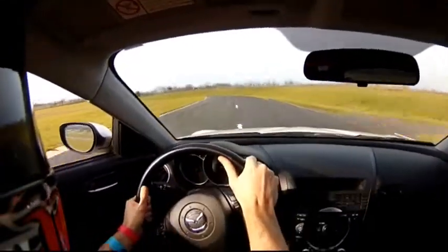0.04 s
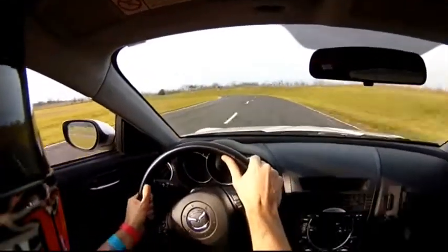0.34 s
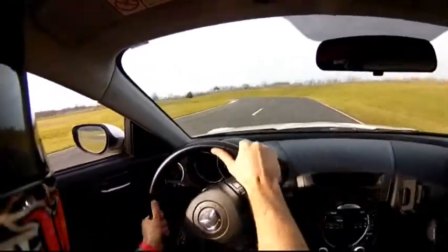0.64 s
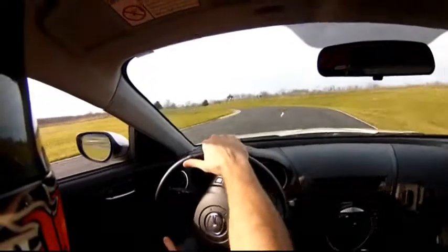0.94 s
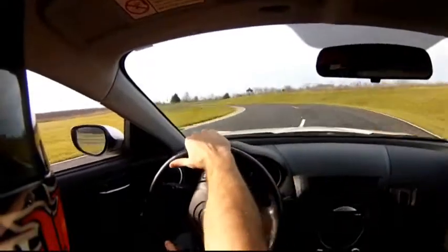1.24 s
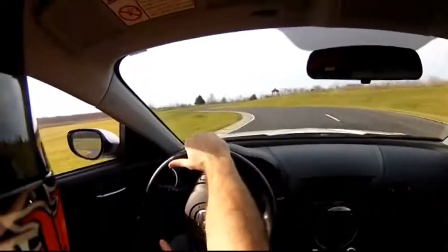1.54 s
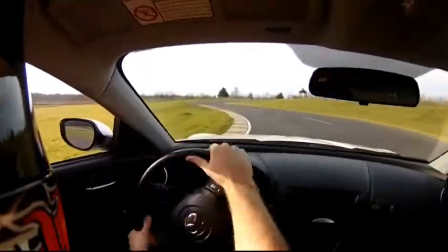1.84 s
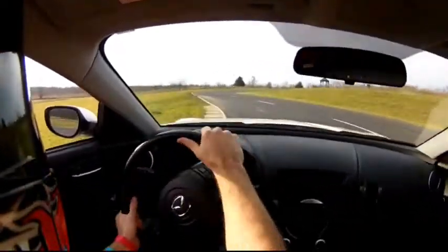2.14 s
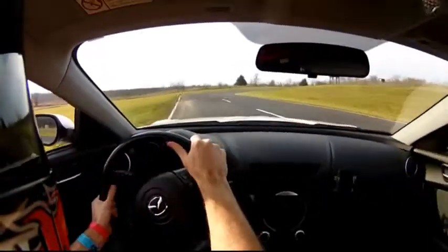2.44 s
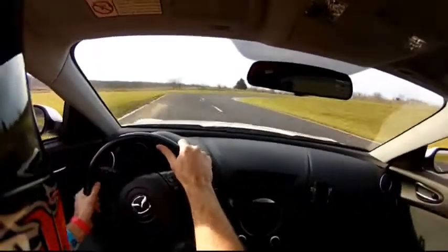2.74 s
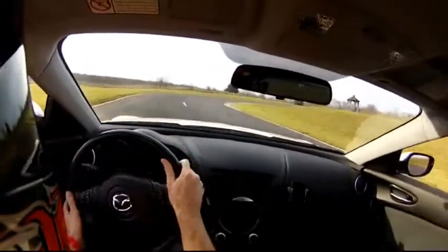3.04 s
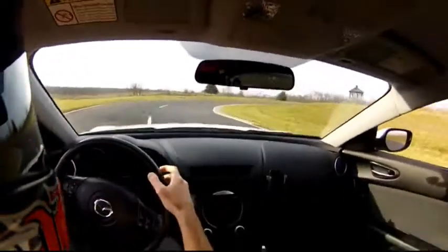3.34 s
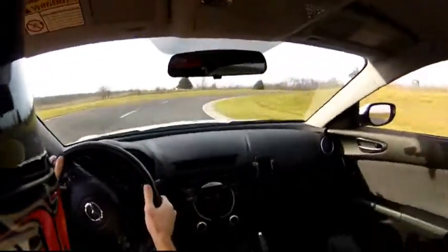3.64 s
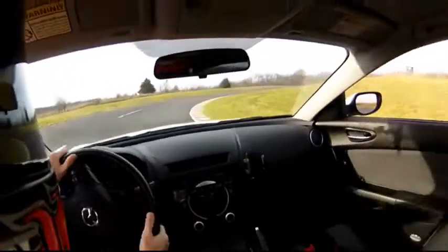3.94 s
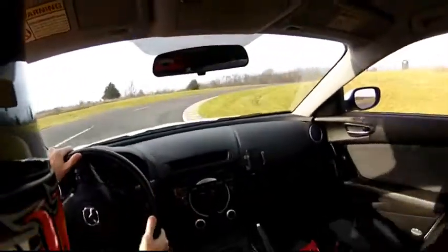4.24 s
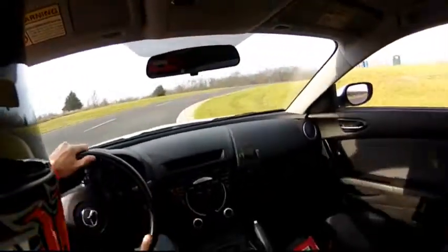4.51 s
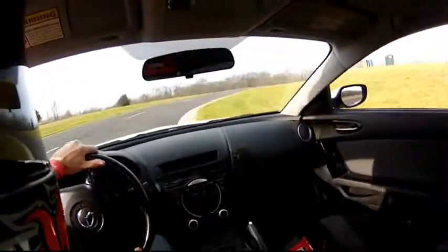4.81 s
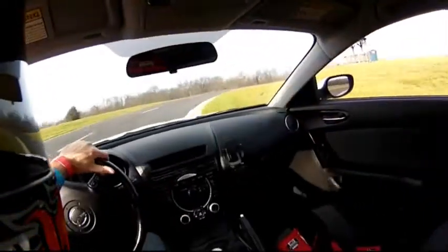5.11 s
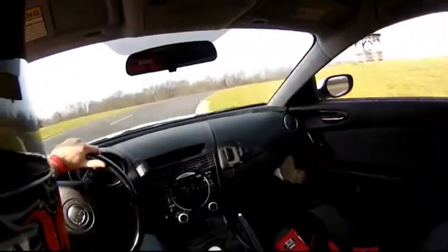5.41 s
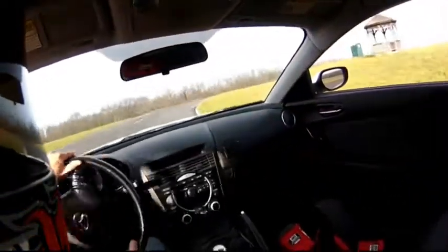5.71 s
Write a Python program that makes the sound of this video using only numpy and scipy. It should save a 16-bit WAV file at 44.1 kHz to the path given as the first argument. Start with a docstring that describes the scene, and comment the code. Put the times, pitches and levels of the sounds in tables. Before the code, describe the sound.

Inside a hard-driven sports car, the engine drones, pulls and eases off over road rumble and bumps, while tyres squeal through two bends.

```python
"""Inside a rotary-engined sports car driven hard through two bends of a race track. From the start the
engine drones, the road rumbles through the shell and bumps thump the body. After a short pull the engine
overruns; from 1.3 s the trim rattles and the tyres scrub and squeal through the first bend. It pulls
again, the tyres sing through the second bend from 4 s, and the growl returns near the end. All along, a
small camera ducks after bumps and holds each sample of a low rate, mirroring the sound into the treble."""
import sys
import numpy as np
from scipy import signal
from scipy.fft import rfft, irfft, next_fast_len
from scipy.io import wavfile
from scipy.ndimage import map_coordinates

SR = 44100
rng = np.random.default_rng(int(sys.argv[2]) if len(sys.argv) > 2 else 0)


def materialize(psi):
    """Save the field psi as 16-bit PCM at rate SR to the path in sys.argv[1].

    A 1-D psi becomes a single channel; in a 2-D psi each row is a channel.
    """
    bounded = np.clip(np.atleast_2d(psi).T, -1, 1)
    quanta = np.round(bounded * 32767).astype(np.int16)
    wavfile.write(sys.argv[1], SR, quanta)


N = 263277
TIME = np.arange(N) / SR


def from_db(db):
    """Decibels to gain."""
    return 10 ** (np.asarray(db) / 20)


def unit_rms(x):
    """Scale to rms 1."""
    return x / np.sqrt(np.mean(x ** 2) + 1e-20)


def curves(rows):
    """The columns of an automation table, drawn out to every sample."""
    seconds, *columns = np.transpose(rows)
    return [np.interp(TIME, seconds, column) for column in columns]


def envelope(start, attack, hold, release):
    """Fades in, holds and fades out along straight lines; times in seconds."""
    return np.clip(np.minimum((TIME - start) / attack, 1 - (TIME - start - attack - hold) / release), 0, 1)


def butter(x, hz, kind, order=2):
    """Butterworth filter."""
    return signal.sosfilt(signal.butter(order, hz, kind, fs=SR, output="sos"), x)


def drift(rate_hz):
    """A smooth random wobble of rms 1, moving at about the given rate."""
    pole = np.exp(-20 * np.pi * rate_hz / SR)   # runs at a tenth of the sample rate
    slow = signal.lfilter([1], [1, -2 * pole, pole * pole], rng.standard_normal(N // 10 + 4002))[4000:]
    return np.interp(np.arange(N) / 10, np.arange(len(slow)), unit_rms(slow))


def noise(spectrum):
    """Noise of the given colour, falling steeply beyond its ends; rms 1."""
    hz, db = np.transpose(spectrum)
    size = next_fast_len(N)
    bin_hz = np.maximum(np.arange(size // 2 + 1) * SR / size, 1)
    roll_off = 1 / (1 + (hz[0] / bin_hz / 2) ** 4 + (bin_hz / hz[-1] / 2) ** 4)
    colour = from_db(np.interp(np.log(bin_hz), np.log(hz), db)) * roll_off
    return unit_rms(irfft(rfft(rng.standard_normal(size)) * colour, size)[:N])


def phase_of(hz):
    """Running phase of a moving pitch."""
    return 2 * np.pi * np.cumsum(hz) / SR


def noise_band(phase, width_hz):
    """A band of noise that rides on a moving pitch; rms 1."""
    return drift(width_hz) * np.cos(phase) + drift(width_hz) * np.sin(phase)


# The driver's foot. Each row: press in seconds, lift in seconds, growl boost in dB when fully down.
THROTTLE_PRESSES = [(-.5, 0.02, 6), (0.467, 1.062, 13), (2.24, 3.28, 20), (5.314, 5.986, 16)]

def throttle(open_s=0.57, close_s=0.27, overrun_db=-47.5):
    """The growl's gain swells as the foot goes down gently and drops as it lifts quickly."""
    growl_db = overrun_db
    for start, lift, boost_db in THROTTLE_PRESSES:
        pedal = envelope(start, open_s, lift - start - open_s, close_s)
        growl_db = growl_db + boost_db * np.sin(np.pi / 2 * pedal)
    return from_db(growl_db)


# The revs. Each row: time in seconds, firing rate in Hz.
REVS = [(0, 125), (.3, 115), (.6, 114.5), (.82, 117), (1.2, 117), (2.25, 100), (2.45, 106.5), (2.85, 108.4),
        (3.5, 115), (4, 104), (4.8, 95), (5.3, 94), (5.65, 99), (5.97, 100)]
# The drone of the first order. Each row: time in seconds, level in dB.
DRONE_LEVELS = [(0, -31), (.15, -23), (.38, -20), (.62, -25), (.85, -21.5), (1.7, -26), (2.5, -32.5),
                (3.3, -25.5), (3.65, -29.5), (5.97, -25)]
# The boom of the second order. Each row: time in seconds, level in dB.
BOOM_LEVELS = [(0, -32), (.38, -27.5), (.6, -35), (.85, -22), (1.17, -19.5), (1.35, -31.5), (2.3, -38.5),
               (2.8, -22), (3.08, -20.5), (3.28, -34.5), (3.47, -26.5), (3.62, -29), (3.95, -28.5),
               (4.5, -38), (5.25, -40.5), (5.5, -29), (5.97, -30.5)]
# Exhaust and cabin resonances that the upper orders sweep. Each row: frequency in Hz, relative gain in dB.
EXHAUST_COLOUR = [(290, -13), (335, -0.5), (400, -3), (445, -0.5), (500, -33), (550, -6.5), (610, -18.5),
                  (690, -7), (765, -22), (875, -16.5), (980, -22), (1100, -15), (1250, -26), (1800, -31.5)]

def engine(wander=0.00436, flutter_db=3.0, burn_roughness=0.24, rasp_db=-15, order_count=17):
    """Evenly spaced firings: two booming low orders, and a raspy growl that opens with the throttle."""
    firing_hz, = curves(REVS)
    drone_db, = curves(DRONE_LEVELS)
    boom_db, = curves(BOOM_LEVELS)
    phase = phase_of(firing_hz * (1 + wander * drift(13.7)))
    orders = {}
    for k in range(1, order_count + 1):
        tone = np.sqrt(2) * np.sin(k * phase + rng.uniform(0, 2 * np.pi))
        orders[k] = tone * from_db(flutter_db * drift(11.8))
    hz, db = np.transpose(EXHAUST_COLOUR)
    growl = sum(orders[k] * np.interp(k * firing_hz, hz, from_db(db)) for k in orders if k > 2)
    growl = unit_rms(growl) * (1 + burn_roughness * drift(93))   # no two burns are equally strong
    gas = butter(rng.standard_normal(N), [400, 1400], "band")
    rasp = unit_rms(gas * (1 + np.cos(phase)) ** 2)   # one puff per firing
    low_end = from_db(drone_db) * orders[1] + from_db(boom_db) * orders[2]
    return low_end + throttle() * (growl + from_db(rasp_db) * rasp)


# The track surface. Each row: time in seconds, suspension shudder in dB, relative tyre roar in dB.
SURFACE_LEVELS = [(0, -45, -40.5), (.37, -25, -41.5), (.62, -28.5, -44.5), (.9, -29, -40.5),
                  (1.04, -21.5, -36), (1.45, -22.5, -44.5), (2.25, -20.5, -41), (2.5, -27, -43.5),
                  (2.95, -25, -40), (3.6, -24.5, -37.5), (4.2, -24.5, -43.5), (4.65, -26, -43),
                  (4.92, -20.5, -53.5), (5.3, -21.5, -46), (5.8, -24, -45.5)]
# Four noise colours, from low to high. Each row: frequency in Hz, relative density in dB.
SHELL_RUMBLE = [(12, -3.5), (26, -7), (40, 2.5), (58, -14.5), (80, -16.5), (130, -36), (250, -40)]
SUSPENSION_SHUDDER = [(40, -18.5), (62, 5.5), (95, -1.5), (140, -0.5), (190, -12), (300, -19.5), (600, -36)]
TREAD_ROAR = [(120, -42), (220, 9.5), (330, 5), (500, 1.5), (750, -6), (1100, -8), (1500, -10.5),
              (2100, -23), (4000, -54)]
AIR_RUSH = [(800, 14), (1500, -1.5), (2100, 2.5), (2800, 2), (4000, 0.5), (5000, -2), (6000, -6)]

def road(rumble_db=-16.5, roar_boost_db=6.0, grain_db=2.5, rush_db=-46.5, rush_follow=0.93, side_db=-12):
    """The shell booms, the suspension shudders, the tread roars on coarse asphalt and air rushes past."""
    shudder_db, roar_db = curves(SURFACE_LEVELS)
    grain = from_db(grain_db * drift(14.5))
    rumble = from_db(rumble_db) * noise(SHELL_RUMBLE)
    shudder = from_db(shudder_db) * noise(SUSPENSION_SHUDDER)
    side = from_db(side_db) * noise(AIR_RUSH)   # only the air has stereo width
    air = noise(AIR_RUSH) + np.array([side, -side])
    rush = from_db(rush_db + rush_follow * (roar_db - roar_db.mean())) * air   # swells with the roar
    roar = from_db(roar_db + roar_boost_db) * noise(TREAD_ROAR)
    return rumble + shudder + grain * (roar + rush)


# Thumps from the track. Each row: start in seconds, relative level in dB, left minus right in dB.
TRACK_BUMPS = [(.04, 0, 0), (1.033, 3, 0), (1.322, -1, 0), (1.746, -1.5, 0), (1.967, 0, 0), (2.867, -4, 0),
               (3.52, 2.5, 2), (3.682, .5, 0), (3.92, 1, 5), (4.209, 2, 0), (4.606, -1.5, 1.5),
               (5.088, -1.5, 0), (5.333, -2, 0), (5.812, -2, 0)]

def bumps(body_hz=56, decay_s=0.0047, gain_db=4.5, soften_hz=260):
    """Each bump gives the body one heavily damped bounce, softened by the tyres."""
    out = np.zeros((2, N))
    for start, db, pan_db in TRACK_BUMPS:
        age = np.maximum(TIME - start, 0)
        decay = np.exp(-np.minimum(age / decay_s, 20))
        bounce = rng.choice([-1, 1]) * np.sin(2 * np.pi * body_hz * age) * decay
        out += np.outer(from_db([db + pan_db / 2, db - pan_db / 2]), bounce)
    return from_db(gain_db) * butter(out, soften_hz, "low")


def stick_slip(hz, octave_db=-22.5):
    """Tread blocks vibrate almost as a sine, with a faint octave."""
    phase = phase_of(hz)
    return np.sqrt(2) * (np.sin(phase) + from_db(octave_db) * np.sin(2 * phase))


# The colour of grit torn over asphalt. Each row: frequency in Hz, relative density in dB.
GRIT_COLOUR = [(850, -22), (1200, 3.5), (1550, 7), (1900, -10.5), (2300, -8), (3100, -2.5), (3800, -14.5)]
# Tyre squeals. Each row: start, swell, hold and fade in seconds, first and last pitch in Hz,
# relative level in dB, share of grit in dB.
TYRE_SLIDES = [(0.082, 0.122, .11, 0.062, 1550, 1620, -49, -14),
               (1.294, 0.24, 0.13, .04, 1190, 1150, -48, -23),
               (1.673, 0.021, 0.3, 0.13, 1275, 1290, -35, -6),
               (1.802, 0.033, 0.046, .12, 1470, 1460, -39, -7.5),
               (2.058, 0.057, 0.18, 0.23, 1288, 1340, -36, -19),
               (2.082, 0.1, 0.14, 0.053, 1460, 1510, -40.5, -6),
               (4.03, 0.12, 0.093, 0.23, 1190, 1200, -38, -7),
               (4.232, 0.056, 0.42, .3, 1096, 1105, -38.5, -13),
               (4.92, 0.13, 0.18, 0.093, 1302, 1290, -47, -11),
               (5.206, 0.12, 0.484, 0.023, 1274, 1295, -39, -12.5),
               (5.544, 0.23, 0.042, 0.052, 2586, 2470, -41.5, -7.5),
               (5.805, 0.052, 0.2, 0.079, 1338, 1410, -36.5, -8.5)]

def slides(jitter=0.01693, stutter_db=4.0, sing_db=-3.5, scrub_db=-5.5, overtone_db=-16.5, gain_db=3.5):
    """A sliding tyre sings unsteadily while the rest of its tread scrubs near that pitch and tears grit."""
    out, grit = 0, noise(GRIT_COLOUR)
    for start, swell, hold, fade, first_hz, last_hz, db, grit_db in TYRE_SLIDES:
        hz = np.interp(TIME, [start, start + swell + hold + fade], [first_hz, last_hz])
        tone = stick_slip(hz * (1 + jitter * drift(70.5)))
        song = unit_rms(tone * from_db(stutter_db * drift(44)))
        phase = phase_of(1.02 * hz)   # the scrub sits slightly sharp
        width_hz = 0.095 * first_hz   # higher slides scrub more widely
        scrub = noise_band(phase, width_hz) + from_db(overtone_db) * noise_band(2 * phase, 2 * width_hz)
        tyre = from_db(sing_db) * song + from_db(scrub_db) * scrub + from_db(grit_db) * grit
        out = out + envelope(start, swell, hold, fade) * from_db(db + gain_db) * tyre
    return butter(out, 950, "high", order=6)   # the squeals carry nothing below about 950 Hz


# Clean tyre chirps. Each row: start in seconds, length in seconds, centre pitch in Hz, level in dB.
TYRE_CHIRPS = [(0.303, 0.066, 1603, -42), (1.688, 0.049, 1286, -25), (1.734, 0.03, 1470, -31),
               (1.779, 0.056, 1280, -23.5), (1.868, 0.049, 1282, -25), (2.085, .031, 1453, -28.5),
               (2.161, 0.018, 1357, -20), (2.194, 0.029, 1485, -27.5), (2.245, 0.051, 1285, -32),
               (4.49, 0.032, 1110, -28), (4.585, 0.037, 1117, -30), (4.698, 0.038, 1110, -30.5),
               (5.624, 0.053, 1280, -35), (5.751, 0.069, 1280, -29.5), (5.761, 0.062, 2490, -39)]

def chirps(jitter=0.012, sag_hz_per_s=800, attack_s=0.0079, release_s=0.017):
    """For a moment the whole contact patch slips in step; the pitch sinks as the tread grips again."""
    out, waver = np.zeros(N), 1 + jitter * drift(60)
    for start, length, hz, db in TYRE_CHIRPS:
        span = np.flatnonzero((TIME >= start) & (TIME < start + length))
        age = TIME[span] - start
        shape = np.clip(np.minimum(age / attack_s, (length - age) / release_s), 0, 1)
        glide_hz = (hz - sag_hz_per_s * (age - length / 2)) * waver[span]
        out[span] += from_db(db) * shape * stick_slip(glide_hz)
    return out


# Ticks of loose trim. Each row: start in seconds, strength of the hit in dB.
TRIM_TICKS = [(1.324, -52), (1.449, -61), (1.737, -47), (2.872, -51), (3.641, -52.5), (3.837, -49),
              (3.915, -54.5), (4.417, -56.5), (4.832, -61.5), (4.903, -63), (4.951, -64), (5.092, -51.5),
              (5.169, -59), (5.335, -52)]
# The ring of the plastic. Each row: pitch in Hz, relative gain in dB, seconds to die away by 60 dB.
TRIM_MODES = [(1960, 5, 0.0068), (2620, 4, 0.0044), (3210, 0.5, 0.011), (3900, 3, 0.0045),
              (4100, 10, 0.0026), (4840, -2, 0.012)]

def trim_rattle(chatter_s=0.0053, gain_db=-4.0):
    """Loose plastic chatters for a few milliseconds and rings in its modes."""
    force, out = 0, 0
    for start, db in TRIM_TICKS:
        decay = np.exp(-np.clip((TIME - start) / chatter_s, 0, 20))
        force = force + from_db(db) * (TIME >= start) * decay
    for hz, db, ring_s in TRIM_MODES:
        pole, angle = from_db(-60 / (ring_s * SR)), 2 * np.pi * hz / SR
        chatter = force * rng.standard_normal(N) + 1e-18
        ring = signal.lfilter([0, np.sin(angle)], [1, -2 * pole * np.cos(angle), pole * pole], chatter)
        out = out + from_db(db) * ring
    return from_db(gain_db) * out


def scene():
    """Everything meets in the same small, dead cabin."""
    return engine() + road() + slides() + chirps() + bumps() + trim_rattle()


def limiter(x, threshold_db=-7.5, release_db_per_s=33.5, attack_s=0.001):
    """In each channel, loud peaks push the gain down quickly; it creeps back up."""
    over_db = np.maximum(20 * np.log10(np.abs(x) + 1e-9) - threshold_db, 0)
    recovery_db = release_db_per_s * TIME
    duck_db = np.maximum.accumulate(over_db + recovery_db, axis=1) - recovery_db
    pole = np.exp(-1 / (attack_s * SR))
    return x * from_db(-signal.lfilter([1 - pole], [1, -pole], duck_db))


def record(dry, band_hz=5400, hold_rate_hz=12000, cutoff_hz=15700):
    """The camera's limiter, then a narrow-band converter whose held samples mirror into the treble."""
    dulled = butter(limiter(dry), band_hz, "low", order=10)
    held_time = np.floor(TIME * hold_rate_hz) / hold_rate_hz
    stepped = [map_coordinates(channel, [held_time * SR], order=3, mode="nearest") for channel in dulled]
    return signal.sosfilt(signal.ellip(14, .1, 90, cutoff_hz, fs=SR, output="sos"), np.array(stepped))


dry = scene()
out = record(dry)
materialize(out)
```